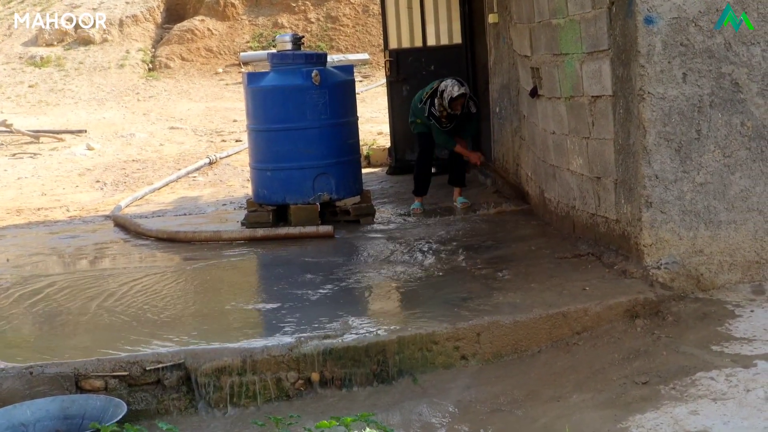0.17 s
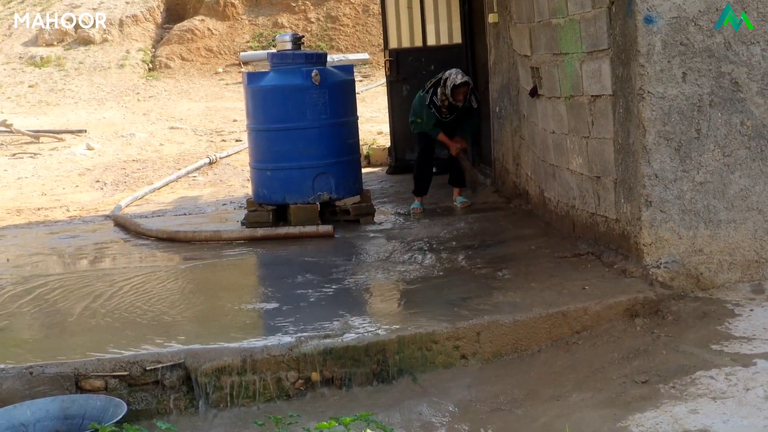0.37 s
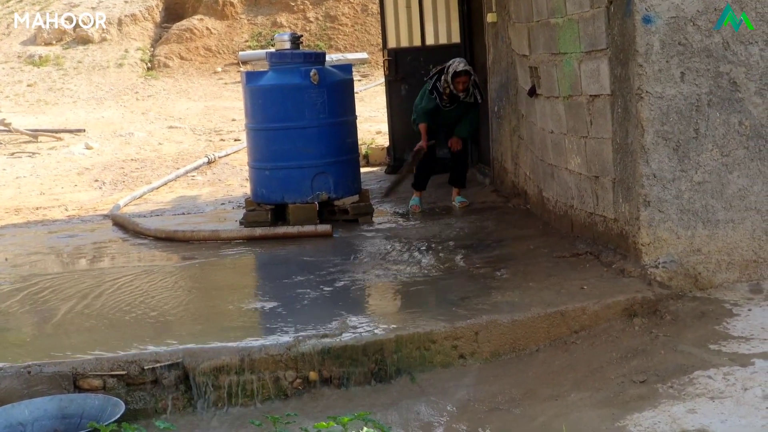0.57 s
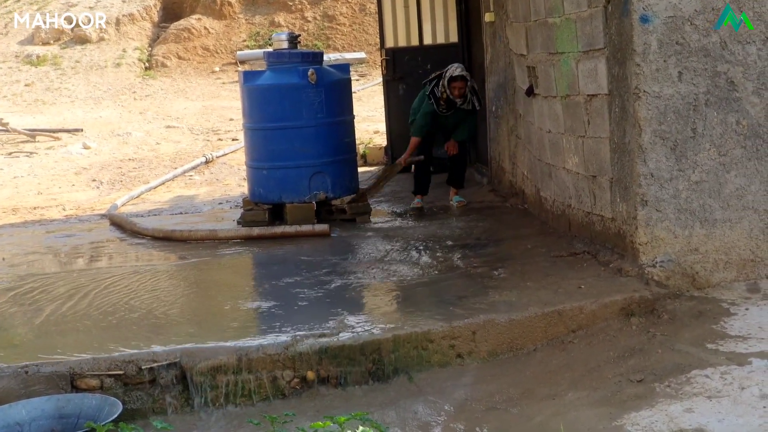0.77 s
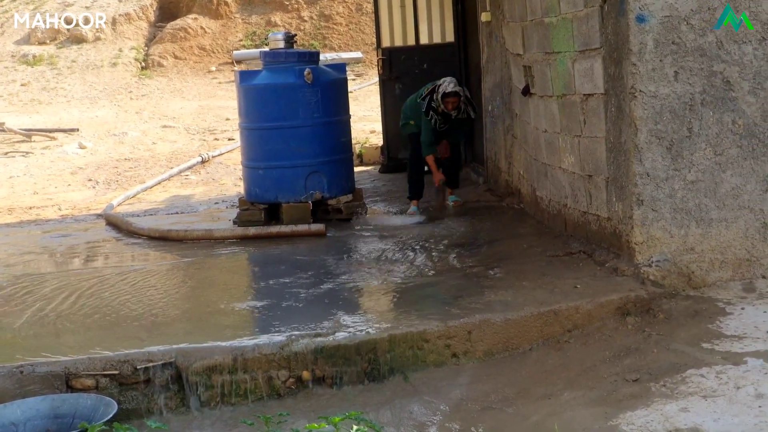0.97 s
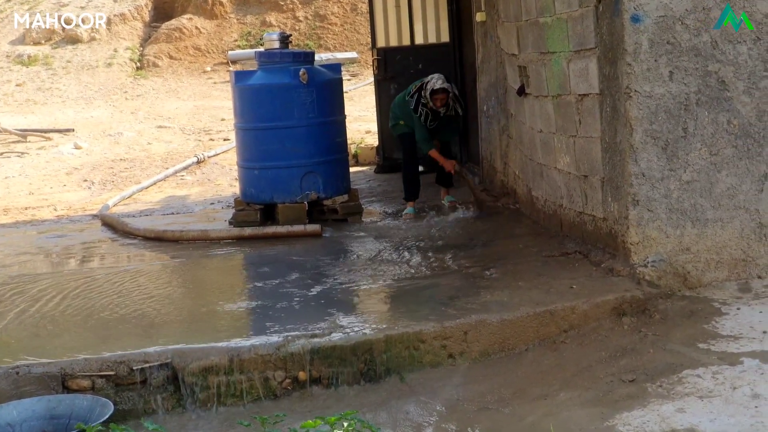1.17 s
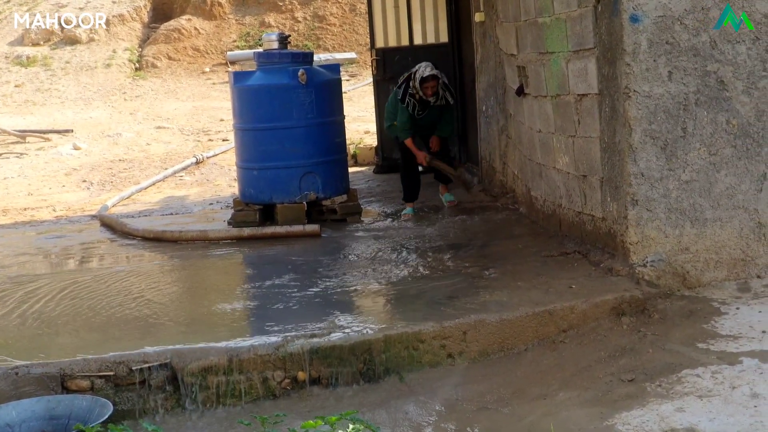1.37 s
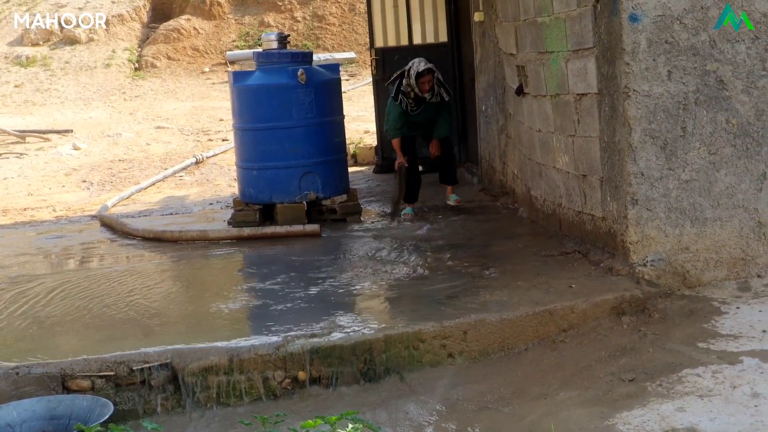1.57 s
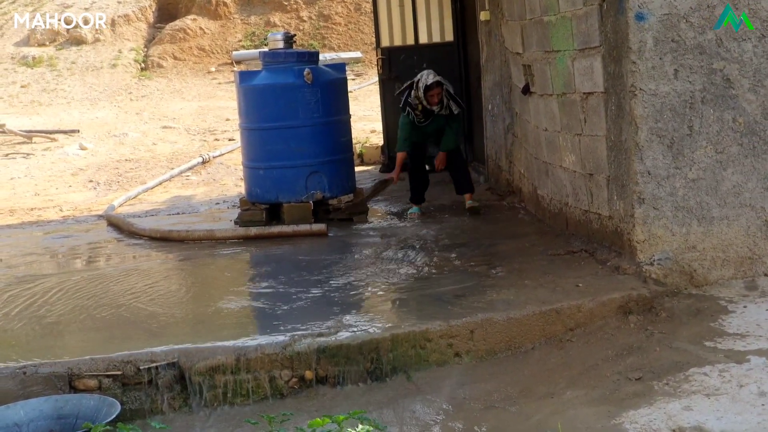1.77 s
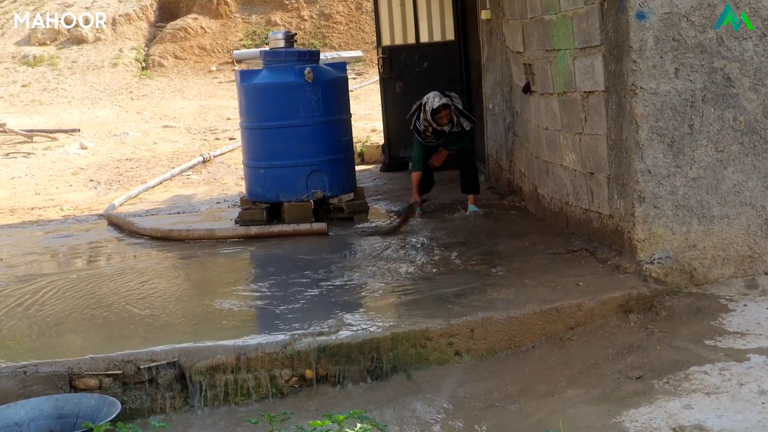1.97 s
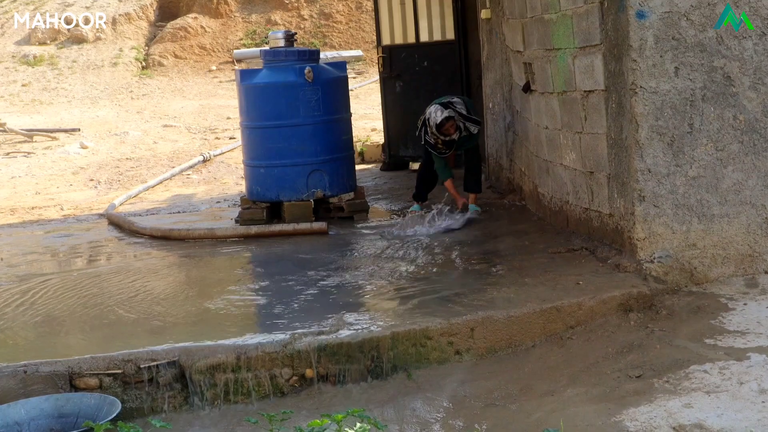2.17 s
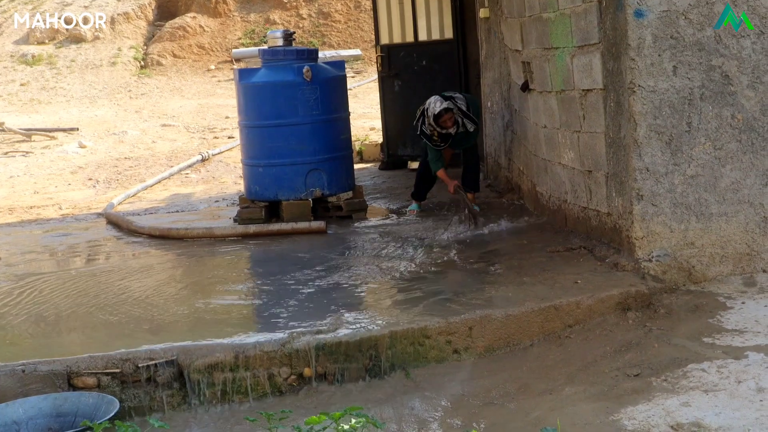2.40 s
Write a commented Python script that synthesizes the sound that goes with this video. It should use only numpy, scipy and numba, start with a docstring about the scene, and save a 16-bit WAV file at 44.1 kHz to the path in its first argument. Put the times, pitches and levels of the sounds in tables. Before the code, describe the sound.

Stiff bristles swish through shallow water on concrete outdoors, water trickling, low wind thumps fluttering

```python
"""A short broom scrubs a flooded concrete yard in three strokes, at about 0, 1 and 2 s; water trickles all the while.
Each stroke is bristle clicks and spatter, over splash clicks in a resonance climbing in pitch; lone drops ring.
Rumble, filtered noise, runs from the start and surges near 0.4 s with the first hard eddies, as a stroke ends.
From 0.8 s gusts flutter, mostly on the right: swept noise and click whirls, slapped by short wavering tones.
Wherever the sum overloads, a limiter ducks both channels and recovers steadily."""
import sys
import numpy as np
from scipy import signal
from scipy.fft import rfft, irfft
from scipy.io import wavfile
from scipy.ndimage import uniform_filter1d, minimum_filter1d
from numba import njit

SR = 44100
rng = np.random.default_rng(int(sys.argv[2]) if len(sys.argv) > 2 else 0)


def wav_out(sig):
    """Save sig, one row per channel (or a flat mono array), as 16-bit PCM at SR to the path in sys.argv[1]."""
    wavfile.write(sys.argv[1], SR, np.round(np.clip(np.atleast_2d(sig).T, -1, 1) * 32767).astype(np.int16))


N = 107471
T = np.arange(N) / SR

# running water: t/s, level/dB
RUNOFF_LEVEL = [(0, -46), (.45, -44.5), (.75, -43), (1.0, -42), (1.25, -45), (1.5, -46), (1.7, -41.5),
                (1.95, -41), (2.44, -41.5)]
# trickle colour: f/Hz, level/dB
TRICKLE_SPECTRUM = [(40, -6), (150, 14), (400, 3.5), (800, -1.5), (1600, -4), (2500, 1), (4000, 1),
                    (6000, -6), (10000, -9), (15500, -9.5)]
# deep wind rumble: t/s, left level/dB, right level/dB
RUMBLE_LEVEL = [(0, -36.5, -30.5), (.08, -58, -37), (.25, -39.5, -40), (.275, -27, -30), (.35, -26, -31),
                (.385, -45, -16.5), (.412, -20, -8), (.435, -29, -14), (.455, -37, -19), (.49, -52, -30),
                (.54, -39, -24), (.615, -40.5, -32.5), (.64, -77, -76), (.8, -85, -87)]
# rumble colour: f/Hz, level/dB
RUMBLE_SPECTRUM = [(20, -30), (45, -2), (90, 4), (190, -1), (300, -10.5), (600, -26), (1200, -38),
                   (3000, -58)]
# fluttering gusts, one list each: t/s, level/dB before FLUTTER_DB and lumps, upper edge f/Hz before lumps
GUST_CURVES = [
    [(.35, -20, 200), (.385, -27.5, 200), (.405, -9.5, 180), (.42, -10, 220), (.433, -13, 280),
     (.45, -49, 250)],
    [(.81, -48, 300), (.83, -32.5, 547), (.86, -37.5, 406), (.92, -49, 240)],
    [(.94, -50, 249), (1.0, -36, 252), (1.056, -28.5, 360), (1.068, -13, 650), (1.086, -11.5, 670),
     (1.11, -15.5, 520), (1.135, -25, 490), (1.18, -45, 350)],
    [(1.315, -41, 370), (1.338, -22, 614), (1.357, -12.5, 960), (1.376, -19.5, 500), (1.42, -24, 680),
     (1.445, -22.5, 587), (1.47, -33.5, 427), (1.54, -47.5, 302)],
    [(1.69, -55, 255), (1.76, -39, 233), (1.835, -40.5, 276), (1.85, -18.5, 397), (1.885, -17.5, 400),
     (1.915, -17, 479), (1.95, -17.5, 560), (1.98, -35.5, 530), (2.01, -23, 416), (2.055, -55, 300)],
    [(2.065, -35, 292), (2.115, -30.5, 405), (2.138, -18.5, 574), (2.17, -28.5, 437), (2.255, -22.5, 505),
     (2.277, -14, 870), (2.3, -18.5, 620), (2.325, -15.5, 1110), (2.34, -18, 620), (2.39, -29, 660),
     (2.46, -17, 617)],
]
# single eddies: peak t/s, peak level/dB before EDDY_DB and filters, f/Hz before wobble, swell time/s
EDDY_EVENTS = [(0.128, -20, 191, 0.0021), (.371, -8.5, 224, 0.0017), (.407, -0.5, 175, 0.012),
               (.416, 2, 587, 0.001), (0.419, 8, 268, 0.0027), (.43, 4, 437, 0.00076),
               (.83, -18.5, 524, 0.0021), (0.849, -29, 383, 0.002), (1.0645, -4, 375, 0.0023),
               (1.0655, -6.5, 1300, 0.00053), (1.08, -3, 470, 0.00088), (1.084, -2.5, 554, 0.0032),
               (1.093, -6, 316, 0.0032), (1.138, -9.5, 610, 0.0008), (1.345, -7, 800, 0.00038),
               (1.354, -3, 630, 0.0021), (1.358, -10, 430, 0.0018), (1.364, 0, 484, 0.001),
               (1.386, -7, 650, 0.0014), (1.413, -8.5, 800, .002), (1.429, -1.5, 680, 0.0007),
               (1.848, -13.5, 290, 0.0043), (1.866, -11, 387, 0.0018), (1.909, -10.5, 1190, 0.00038),
               (1.91, 1, 520, 0.00054), (1.915, 0, 283, 0.0023), (1.932, -9, 500, 0.0013),
               (1.996, -7, 394, 0.0024), (2.083, -11, 287, 0.0014), (2.138, -5, 547, 0.0033),
               (2.251, 2, 505, 0.00074), (2.274, -4.5, 734, 0.0012), (2.278, -7.5, 390, 0.0042),
               (2.316, -10.5, 902, .004), (2.324, 2.5, 794, 0.0017), (2.327, -9.5, 1310, 0.0022),
               (2.329, 5.5, 556, 0.0011), (2.37, -11, 380, 0.0021)]
# the wind veers, changing what reaches the left port: t/s, level/dB
LEFT_EXPOSURE_LEVEL = [(.45, -28), (.82, 11), (1.07, -3), (1.8, 2.5), (1.92, -2.5), (2.44, 1.5)]
# drops and splats that stand out: t/s, peak level/dB, f/Hz
LONE_DROPS = [(.135, -15, 2390), (0.166, -12.5, 2820), (.382, -28.5, 3400), (.693, -28.5, 3960),
              (0.917, -40, 1440), (1.046, -20, 1950), (1.596, -32, 1630), (2.003, -21.5, 3200),
              (2.107, -23, 1520)]
# pushed water: peak t/s, rise/s, fall/s, level/dB before SLOSH_DB, f/Hz at the peak
SLOSH_EVENTS = [(.065, 0.038, 0.039, -22, 2140), (.172, 0.053, 0.041, -21, 2500),
                (1.07, 0.0075, 0.07, -30.5, 1880), (1.242, 0.11, 0.062, -30.5, 1800),
                (2.14, 0.066, 0.15, -29.5, 2140), (2.38, 0.28, 0.095, -33, 1730)]
# bristles on the floor: peak t/s, rise/s, fall/s, level/dB
SCRAPE_EVENTS = [(.03, 0.15, 0.12, -30), (0.174, 0.0088, 0.097, -27.5), (.37, 0.019, 0.025, -55),
                 (1.042, 0.025, 0.074, -32), (1.3, 0.061, 0.075, -40), (1.8, 0.29, 0.21, -46.5),
                 (2.133, 0.085, 0.04, -35.5), (2.191, 0.05, 0.061, -35)]
# bristle colour: f/Hz, level/dB
BRISTLE_SPECTRUM = [(300, -66), (700, -36), (1100, -12.5), (1700, -3), (3000, 0), (4200, -3.5),
                    (5500, -8.5), (8000, -14.5), (11000, -21), (15500, -22.5)]
# left-right likeness of the yard: f/Hz, correlation
LIKENESS_SPECTRUM = [(100, .6), (700, .8), (1500, .94), (3000, .91), (5000, .6), (7000, .25), (15000, 0)]
# left minus right: f/Hz, level/dB
BALANCE_SPECTRUM = [(100, -2.5), (900, 1.5), (2400, -1.5), (4400, -4), (8000, 2.5), (15000, 3)]
# echoes off the ground, the wall and the tank: delay t/s, level/dB
ECHO_TAPS = [(.0031, -33), (.0083, -27.5), (0.0136, -19), (0.027, -20.5)]

# water
DROPS_PER_S, DROP_SPREAD_DB, DROPS_DB, DROP_CYCLES = 380, 4.0, -8, 26
TICKS_PER_S, TICK_SPREAD_DB, TICK_LOW_HZ, TICKS_DB = 33, 13.5, 7000, -35
LONE_DROP_CYCLES = 32
SLOSH_OCTAVES_PER_S, SLOSH_Q, SLOSH_DB = 0.84, 1.86, -5.5
PATCHY_DB, PATCHY_PER_S = 2, 17.5
# bristles
FLICKS_PER_S, FLICK_SPREAD_DB = 3500, 3
SPATTER_PER_S, SPATTER_DB, SPATTER_CYCLES = 900, -7, 12
# wind
FLUTTER_DB, FLUTTER_LOW_HZ, FLUTTER_Q, EVEN_S = 0.5, 175, 1.31, 0.054
LUMPS_DB, LUMPS_PER_S, EDGE_OCTAVES_PER_DB = 1.69, 58, 0.1353
WHIRLS_PER_S, WHIRL_SPREAD_DB, SMOOTH_AIR_DB = 800, 2.0, -6
WIND_LEFT_DB, WIND_LEFT_OWN_DB = 2.5, -19.5  # right port's wind and own turbulence, both before exposure
LEFT_LAG_RAD, LEFT_EDGE_HZ, WIND_LOW_HZ = 0.3, 143, 108
EDDY_DB, EDDY_WOBBLE_RAD, EDDY_WOBBLE_PER_S = -1, 0.55, 370
EDDY_LOW_HZ, EDDY_EDGE_HZ = 129, 1720
SNAP_DB, SNAP_HZ, SNAP_CYCLES = -8, 1280, 2.5  # SNAP_DB adds to EDDY_EVENTS level
# microphones and limiter
LEFT_LEADS_S = .00004
CEILING, RELEASE_DB_PER_S, LIMITER_ATTACK_S = 0.98, 75, 0.001
LOW_CUT_HZ, CUTOFF_HZ = 44, 15900


def from_db(db):
    """Decibels to gain."""
    return 10 ** (np.asarray(db) / 20)


def rms_one(x):
    """Scale to rms 1."""
    return x / np.sqrt(np.mean(x ** 2) + 1e-20)


def in_time(rows):
    """Each column of a curve, per sample."""
    s, *columns = np.transpose(rows)
    return [np.interp(T, s, c) for c in columns]


def per_bin(points):
    """A table over log frequency, per FFT bin."""
    hz, value = np.transpose(points)
    return np.interp(np.log(np.fft.rfftfreq(N, 1 / SR) + 1), np.log(hz), value)


def coloured(x, spectrum):
    """Give a steady texture a spectrum; rms 1."""
    return rms_one(irfft(rfft(x) * from_db(per_bin(spectrum)), N))


def butter(x, hz, kind, order=2):
    """Butterworth low- or high-pass."""
    sos = signal.butter(order, min(hz, SR / 2 - 1), kind, fs=SR, output="sos")
    return signal.sosfilt(sos, x)


def evened(x):
    """Divide out the slow swings of a noise; rms near 1."""
    size = int(EVEN_S * SR)
    power = uniform_filter1d(uniform_filter1d(x ** 2, size), size // 2)
    return x / np.sqrt(power + 1e-12)


@njit
def moving_filter(x, hz, q):
    """Two-pole filter with a moving centre: low-pass and band-pass outputs."""
    low, band = np.zeros(len(x)), np.zeros(len(x))
    s1, s2 = 0., 0.
    for i in range(len(x)):
        g = np.tan(np.pi * hz[i] / SR)
        band[i] = (s1 + g * (x[i] - s2)) / (1 + g * (g + 1 / q))
        low[i] = s2 + g * band[i]
        s1, s2 = 2 * band[i] - s1, 2 * low[i] - s2
    return low, band


def ring(x, hz, cycles):
    """A unit click rings a sine, initial height 1, that falls 60 dB in so many cycles."""
    r = np.exp(-np.log(1000) * hz / (cycles * SR))
    w = 2 * np.pi * hz / SR
    return signal.lfilter([0, np.sin(w)], [1, -2 * r * np.cos(w), r * r], x + 1e-18)


def strike(s, db):
    """One click."""
    return from_db(db) * (np.arange(N) == int(s * SR))


def clicks(per_s, spread_db):
    """Two rows of random clicks of uneven size and either sign."""
    sizes = from_db(spread_db * np.minimum(rng.exponential(1, (2, N)), 5))
    return sizes * rng.choice([-1, 1], (2, N)) * (rng.random((2, N)) < per_s / SR)


def bubbles(per_s, cycles, low_hz, high_hz, count=28):
    """Drops and bubbles ring briefly at scattered pitches; rms 1."""
    born = clicks(per_s, DROP_SPREAD_DB)
    dealt = rng.integers(0, count, N)  # pitch index
    pitches_hz = np.geomspace(low_hz, high_hz, count)
    return rms_one(sum(ring(born * (dealt == k), hz, cycles) for k, hz in enumerate(pitches_hz)))


def swell(peak_s, rise_s, fall_s):
    """A Gaussian rise to the peak, then an exponential fall."""
    before = np.minimum(T - peak_s, 0) / rise_s
    after = np.maximum(T - peak_s, 0) / fall_s
    return np.exp(-before ** 2 / 2 - after)


def drift(per_s):
    """Slow random curve, rms 1, computed every 40 samples."""
    r = np.exp(-80 * np.pi * per_s / SR)
    slow = signal.lfilter([1], [1, -2 * r, r * r], rng.standard_normal(N // 40 + 502))[500:]
    return np.interp(np.arange(N) / 40, np.arange(len(slow)), rms_one(slow))


def patchy(x, count=12):
    """Splashing is uneven: each overlapping band swells on its own."""
    log_hz = np.log(np.fft.rfftfreq(N, 1 / SR) + 1)
    place = np.interp(log_hz, np.log([700, 15000]), [0, count - 1])
    spectrum, out = rfft(x), 0
    for k in range(count):
        band = irfft(spectrum * np.maximum(1 - abs(place - k), 0), N)
        out = out + band * from_db(PATCHY_DB * drift(PATCHY_PER_S))
    return out


def yard(pair):
    """Two unrelated rows become left and right: alike in the mids, diffuse in the treble, left slightly early."""
    mid, side = rfft(pair)
    alike = np.clip(per_bin(LIKENESS_SPECTRUM), -1, 1)
    sign = np.array([[1], [-1]])
    lead = np.exp(1j * np.pi * np.fft.rfftfreq(N, 1 / SR) * LEFT_LEADS_S * sign)
    balance = from_db(sign * per_bin(BALANCE_SPECTRUM) / 2)
    spread = np.sqrt(1 + alike) * mid + sign * np.sqrt(1 - alike) * side
    return irfft(spread * lead * balance, N) / np.sqrt(2)


def walls(x):
    """Add the few early echoes of the open yard."""
    echoes = 0
    for s, db in ECHO_TAPS:
        echoes = echoes + from_db(db) * np.pad(x, ((0, 0), (int(s * SR), 0)))[:, :N]
    return x + echoes


def runoff():
    """Water runs off the slab: fine crackle, ringing drops and sharp drips on the concrete."""
    level_db, = in_time(RUNOFF_LEVEL)
    crackle = coloured(clicks(per_s=6000, spread_db=3.5), TRICKLE_SPECTRUM)
    drops = bubbles(DROPS_PER_S, DROP_CYCLES, low_hz=1310, high_hz=4440)
    ticks = rms_one(butter(clicks(TICKS_PER_S, TICK_SPREAD_DB), TICK_LOW_HZ, "high"))
    return from_db(level_db) * (crackle + from_db(DROPS_DB) * drops + from_db(TICKS_DB) * ticks)


def rumble():
    """Slow turbulence, separate at each port."""
    noise = coloured(rng.standard_normal((2, N)), RUMBLE_SPECTRUM)
    return from_db(in_time(RUMBLE_LEVEL)) * evened(noise)


def eddies():
    """Each eddy is a few uneven pressure swings that swell and die within milliseconds, with a snap at the crest."""
    wobble = EDDY_WOBBLE_RAD * drift(EDDY_WOBBLE_PER_S)
    swings, crests = 0, 0
    for s, db, hz, length_s in EDDY_EVENTS:
        tone = np.sin(2 * np.pi * hz * (T - s) + wobble)
        swings = swings + from_db(db + EDDY_DB) * swell(s, length_s, length_s) * tone
        crests = crests + strike(s, db + SNAP_DB)
    snaps = ring(crests, SNAP_HZ, SNAP_CYCLES)
    return butter(butter(swings + snaps, EDDY_EDGE_HZ, "low"), EDDY_LOW_HZ, "high")


def gusts():
    """Lumpy whirls, brighter when stronger, and eddies hit the right port; the left gets them later and duller."""
    level_db, edge_hz = in_time([row for gust in GUST_CURVES for row in gust])
    gates = sum((T > gust[0][0]) & (T < gust[-1][0]) for gust in GUST_CURVES)
    blowing = uniform_filter1d(1. * gates, size=300)
    lumps_db = LUMPS_DB * np.clip(drift(LUMPS_PER_S), -3, 1.3)
    edge_hz = np.clip(edge_hz * 2 ** (EDGE_OCTAVES_PER_DB * lumps_db), 50, 5000)

    smooth_air = from_db(SMOOTH_AIR_DB) * rng.standard_normal((2, N))
    whirls = rms_one(clicks(WHIRLS_PER_S, WHIRL_SPREAD_DB)) + smooth_air
    air = butter(whirls, FLUTTER_LOW_HZ, "high")
    air = np.array([moving_filter(row, edge_hz, FLUTTER_Q)[0] for row in air])
    air = evened(butter(air, hz=1320, kind="low"))
    right, left_own = air * from_db(level_db + lumps_db + FLUTTER_DB) * blowing
    right = right + eddies()

    dull = signal.hilbert(butter(right, LEFT_EDGE_HZ, "low", order=1))
    lagged = np.real(dull * np.exp(-1j * LEFT_LAG_RAD))
    left = from_db(WIND_LEFT_DB) * lagged + from_db(WIND_LEFT_OWN_DB) * left_own
    exposure_db, = in_time(LEFT_EXPOSURE_LEVEL)
    return butter(np.array([left * from_db(exposure_db), right]), WIND_LOW_HZ, "high")


def lone_drops():
    """Larger drops fall back into the puddle and ring."""
    return sum(ring(strike(s, db), hz, LONE_DROP_CYCLES) for s, db, hz in LONE_DROPS)


def sloshes():
    """Dense splashes in a broad resonance that climbs as the sheet of water thins."""
    out = 0
    for s, rise, fall, db, hz in SLOSH_EVENTS:
        centre_hz = hz * 2 ** np.clip(SLOSH_OCTAVES_PER_S * (T - s), -.5, .5)
        splashes = butter(clicks(per_s=5000, spread_db=2.0), hz=3770, kind="low")
        splashes = butter(splashes, hz=860, kind="high")
        water = np.array([moving_filter(row, centre_hz, SLOSH_Q)[1] for row in splashes])
        out = out + from_db(db + SLOSH_DB) * swell(s, rise, fall) * rms_one(water)
    return out


def bristles():
    """Thousands of bristle flicks on wet concrete, with spatter thrown up."""
    push = sum(from_db(db) * swell(s, rise, fall) for s, rise, fall, db in SCRAPE_EVENTS)
    flicks = coloured(clicks(FLICKS_PER_S, FLICK_SPREAD_DB), BRISTLE_SPECTRUM)
    spatter = bubbles(SPATTER_PER_S, SPATTER_CYCLES, low_hz=1360, high_hz=4130)
    return push * (flicks + from_db(SPATTER_DB) * spatter)


def scene():
    """Broom and water across the yard, wind at the microphone."""
    water = yard(patchy(runoff() + sloshes() + bristles()))
    return rumble() + gusts() + walls(water + lone_drops())


def record(dry):
    """A limiter ducks both channels on overload and recovers steadily; the deepest bass and the top are cut."""
    over_db = 20 * np.log10(np.maximum(np.abs(dry).max(axis=0) / CEILING, 1))
    release_db = RELEASE_DB_PER_S * T
    duck_db = np.maximum.accumulate(over_db + release_db) - release_db
    size = int(LIMITER_ATTACK_S * SR) + 1
    gain = uniform_filter1d(minimum_filter1d(from_db(-duck_db), size), size)
    top_cut = signal.ellip(12, .1, 80, CUTOFF_HZ, fs=SR, output="sos")
    return signal.sosfilt(top_cut, butter(dry * gain, LOW_CUT_HZ, "high"))


dry = scene()
out = record(dry)
wav_out(out)
```